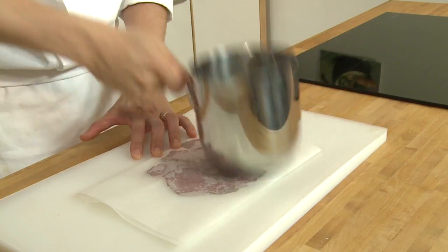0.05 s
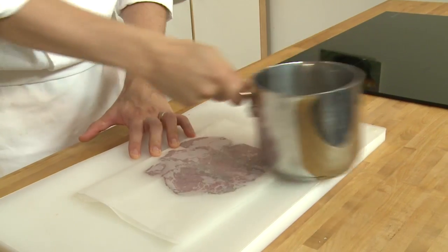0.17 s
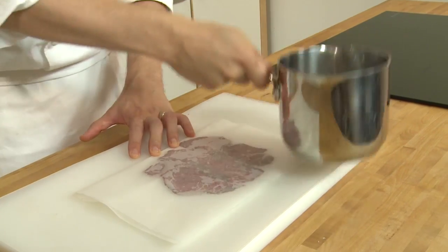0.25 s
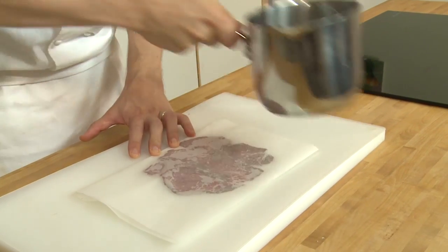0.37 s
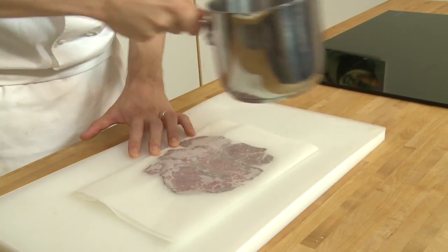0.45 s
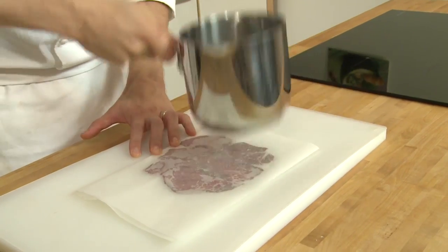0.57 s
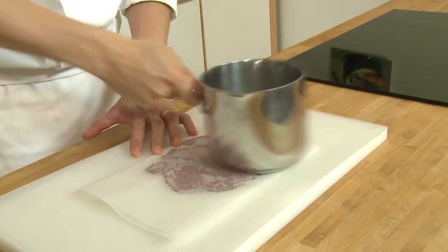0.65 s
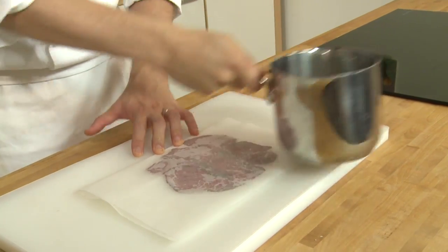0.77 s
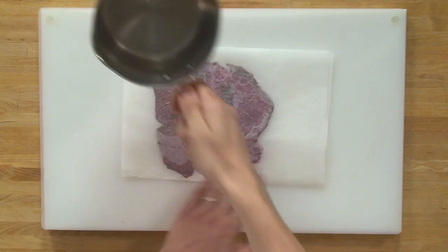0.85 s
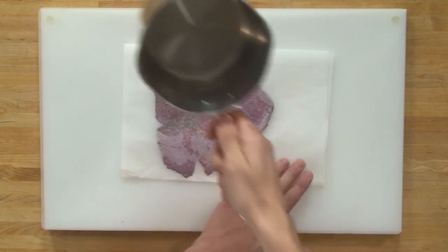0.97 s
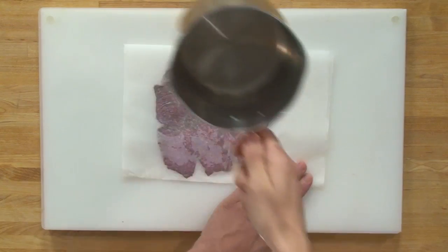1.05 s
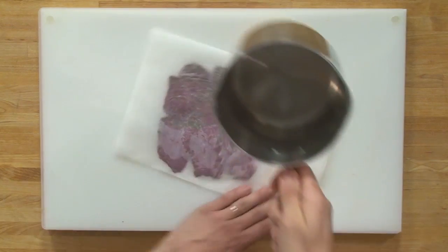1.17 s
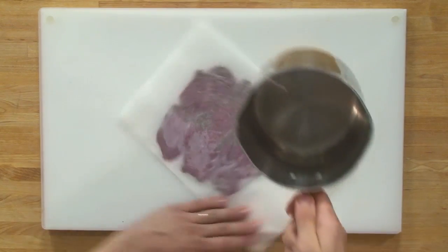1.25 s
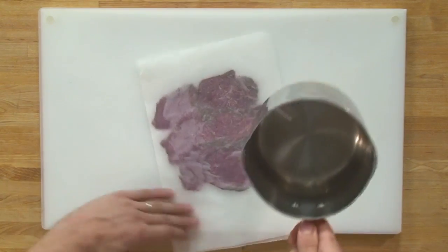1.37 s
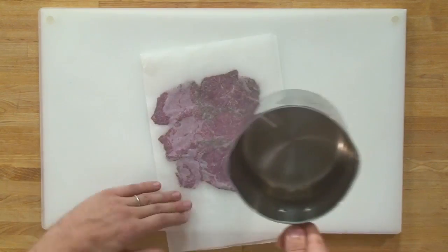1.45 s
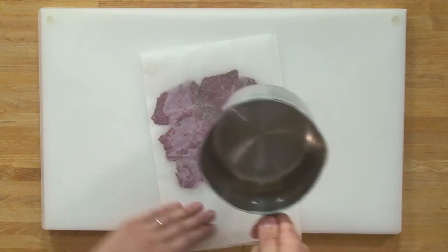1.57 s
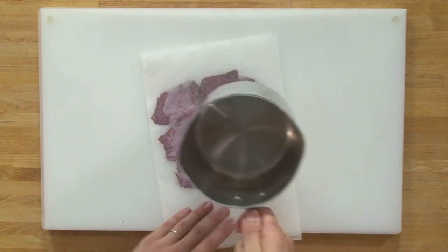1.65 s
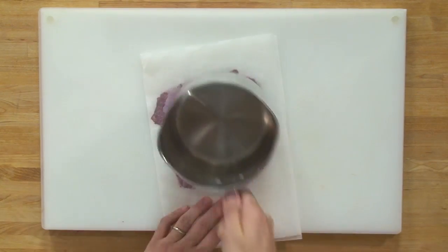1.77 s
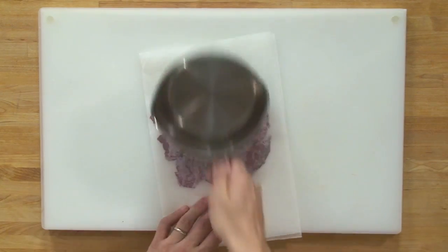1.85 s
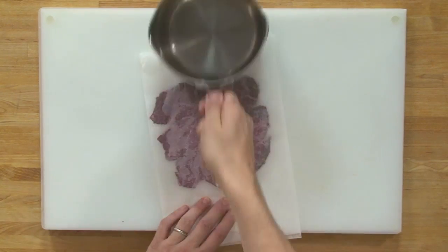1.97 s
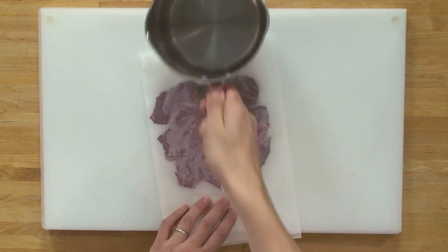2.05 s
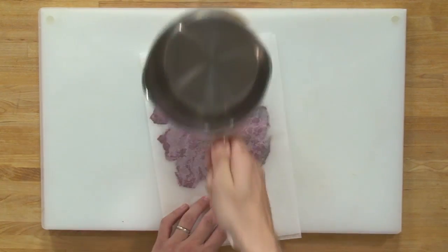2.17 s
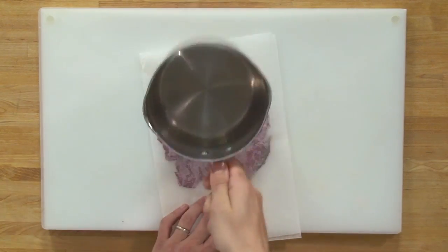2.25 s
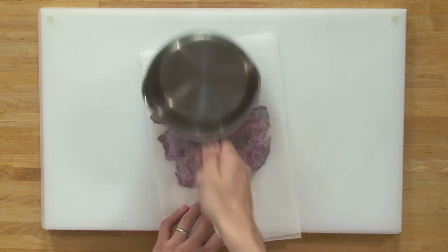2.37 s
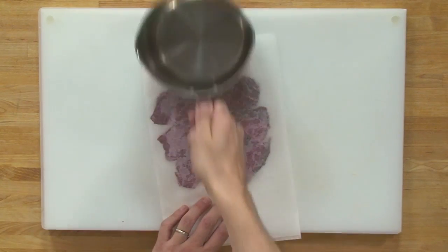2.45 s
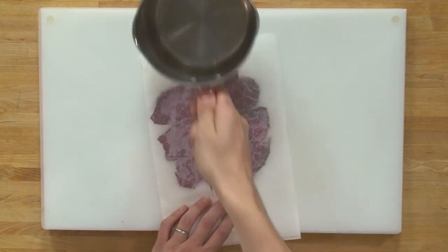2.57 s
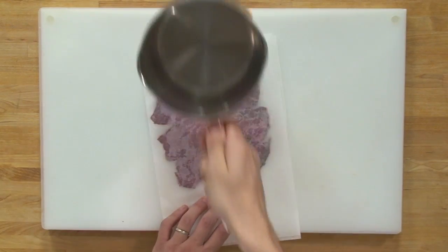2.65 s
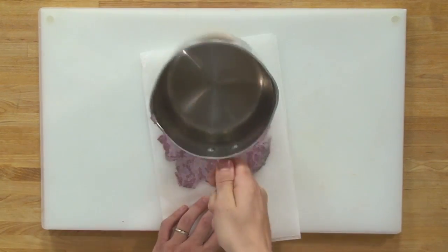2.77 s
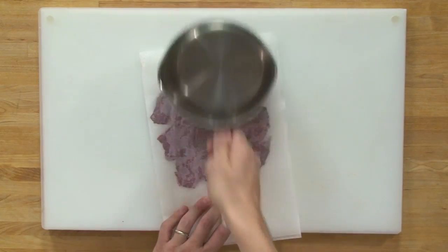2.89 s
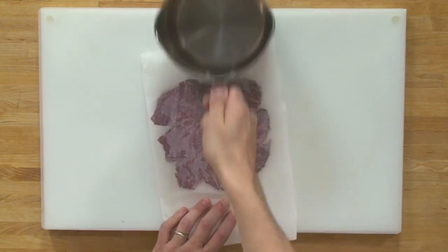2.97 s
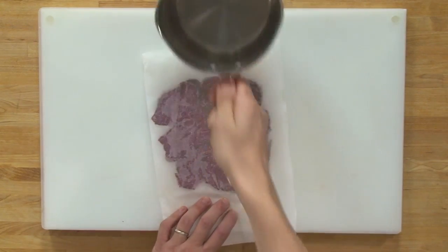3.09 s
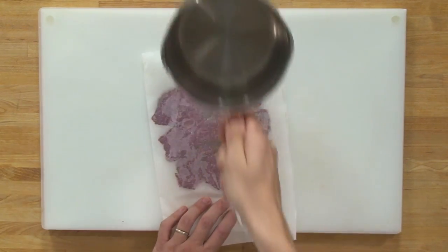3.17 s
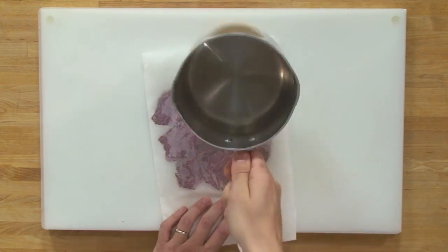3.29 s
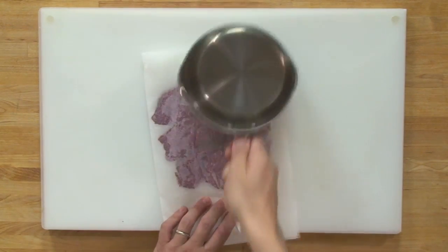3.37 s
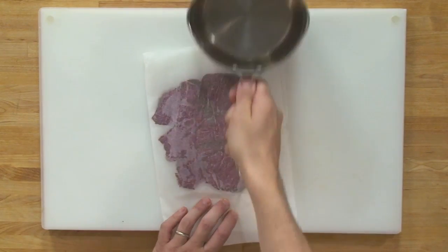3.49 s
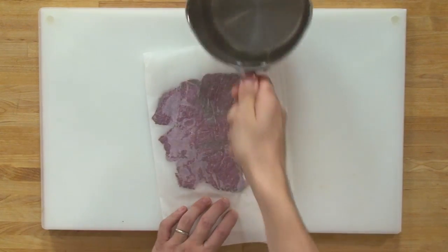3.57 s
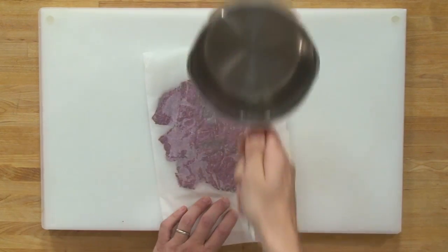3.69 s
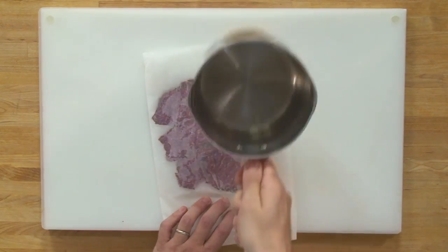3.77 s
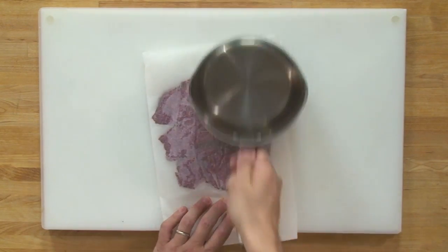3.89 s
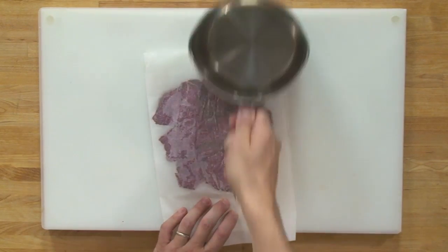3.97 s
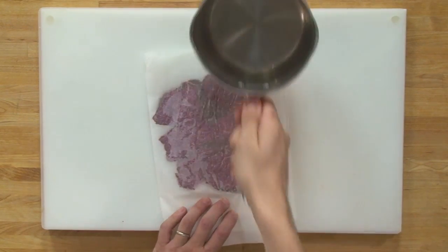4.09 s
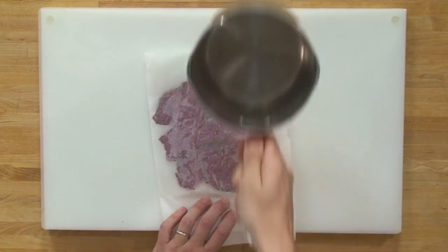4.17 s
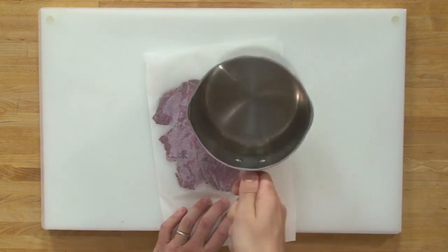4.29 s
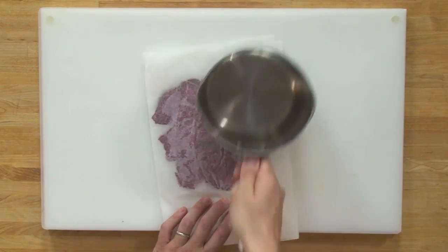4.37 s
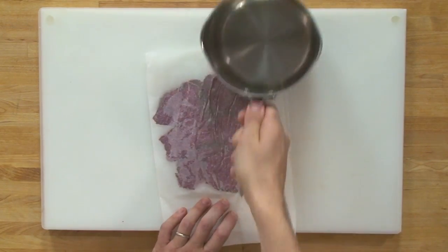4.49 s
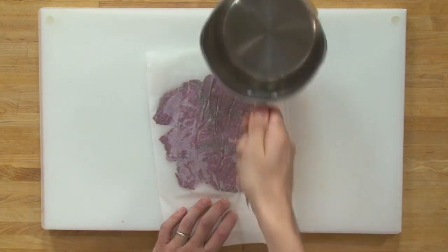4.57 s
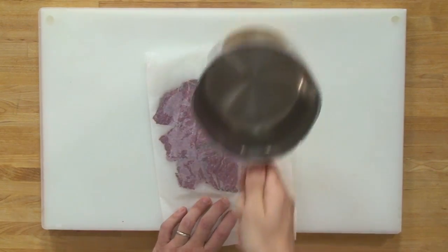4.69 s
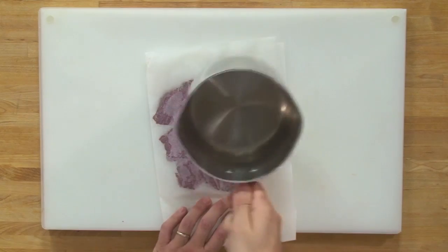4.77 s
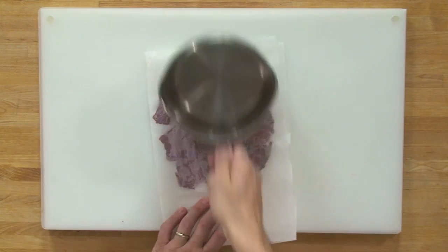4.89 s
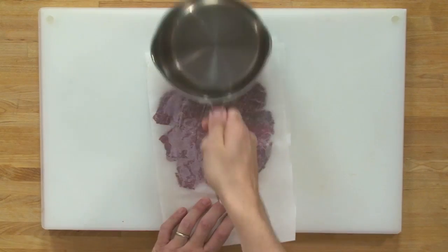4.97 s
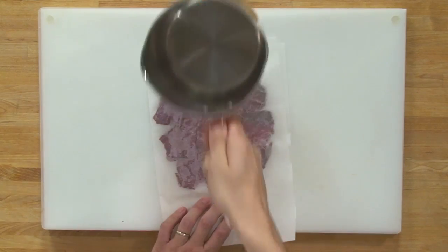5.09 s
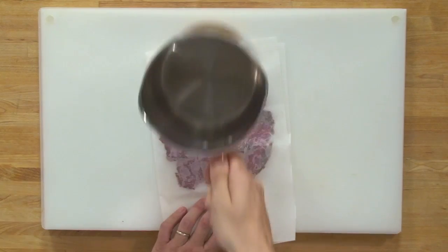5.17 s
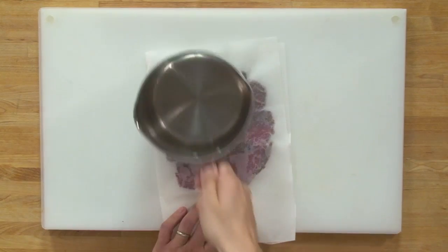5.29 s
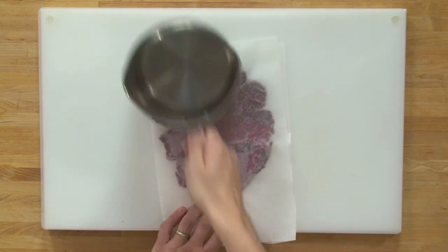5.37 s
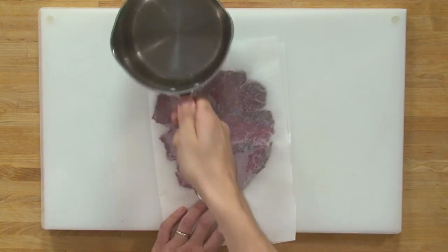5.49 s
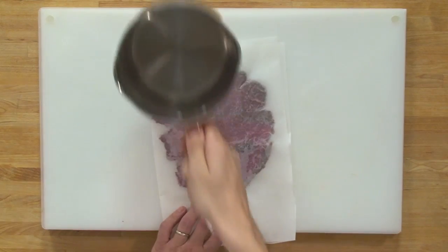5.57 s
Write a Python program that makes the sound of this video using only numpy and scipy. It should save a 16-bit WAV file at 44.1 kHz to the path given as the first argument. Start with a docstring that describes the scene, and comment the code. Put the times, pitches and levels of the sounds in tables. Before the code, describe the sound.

A steel saucepan pounds meat between paper sheets on a plastic board over a wooden worktop. Two hard blows come first, then a faint paper slide and soft bumps, one weak blow, and seven strong blows about half a second apart. Papery slaps, knocks and low booms ring briefly in a small kitchen, miked close over quiet room rumble.

```python
"""Pounding meat in a kitchen

A steel saucepan pounds thin meat between sheets of paper on a plastic cutting board, ten blows.
Each blow is shaped noise (paper slap, clack), dying sines (board, worktop) and short pushes; echoes and
a dense tail make the kitchen. After the second blow a hand turns the paper: grainy friction hiss and
soft bumps. Snaps of noise are the paper ticking as the pan lifts off. A low room tone lies beneath."""
import sys
import numpy as np
from scipy import signal
from scipy.fft import rfft, irfft
from scipy.io import wavfile

SR = 44100
rng = np.random.default_rng(int(sys.argv[2]) if len(sys.argv) > 2 else 0)


def master(y):
    """Save y as 16-bit WAV."""
    cut = np.clip(np.atleast_2d(y).T, -1, 1)
    pcm = np.round(cut * 32767)  # scale
    wavfile.write(sys.argv[1], SR, pcm.astype(np.int16))


N = 248283

# The blows of the pan: (time [s], force re a usual blow [dB], time until the tilted base lands flat [s],
# relative paper slap level [dB], slap brightness [dB per octave])
BLOWS = [(0.1435, 2, 0.0038, -8, 1.5), (0.7095, 1.14, 0.0039, -8.5, -1.5),
         (1.9836, -10.5, 0.0052, -12, 3.5), (2.5114, 0.5, 0.0066, -5.5, -0.6), (3.032, 0, 0.0053, -8, 0.2),
         (3.5312, -0.75, 0.0049, -8, 4), (4.0319, 0.55, 0.0061, -10.5, -.3),
         (4.5092, -0.2, 0.0024, -9, 0.5), (5.008, 0, 0.0066, -11, -1.5), (5.475, 0, 0.0031, -6, 1.1)]
# Spectrum of the hard clack of pan on board: (frequency [Hz], relative density [dB])
CLACK_SPECTRUM = [(300, 0), (550, -1), (800, 0.5), (1300, -4.5), (1800, -8.5), (2600, -9.5), (6000, -29)]


def gain_of(db):
    """Amplitude factor of a level in dB."""
    return 10 ** (np.asarray(db) / 20)


def evened(x):
    """Scales a steady sound to an RMS of one."""
    return x / np.sqrt(np.mean(x ** 2) + 1e-20)


def unit(x):
    """Scales a short sound to an energy of one."""
    return x / np.linalg.norm(x)


def read(points, hz):
    """Reads a curve between its points, along log frequency."""
    f, value = np.transpose(points)
    return np.interp(np.log(hz + 1), np.log(f), value)


def tilted(rows, slope, pivot_hz):
    """Tips the levels of a spectrum or of modes by so many dB per octave."""
    return [(hz, db + slope * np.log2(hz / pivot_hz), *rest) for hz, db, *rest in rows]


def add(mix, s, sound):
    """Lays a sound into the mix at s seconds, cut off at the end."""
    part = mix[round(s * SR):][:len(sound)]
    part += sound[:len(part)]


def colour(x, spectrum, size=4096):
    """Causal minimum-phase filter with the given spectrum."""
    hz = abs(np.fft.fftfreq(size, 1 / SR))
    log_gain = np.log(gain_of(read(spectrum, hz)))
    taps = np.fft.ifft(np.exp(np.conj(signal.hilbert(log_gain)))).real
    return signal.oaconvolve(x, taps[:size // 2])[:len(x)]


def low_pass(x, hz):
    """Gentle second-order treble cut."""
    return signal.sosfilt(signal.butter(2, hz, fs=SR, output="sos"), x)


def ring(modes, t):
    """Resonances as dying sines that start at t = 0."""
    t = np.maximum(t, 0)
    return sum(gain_of(db - 60 * t / t60) * np.sin(2 * np.pi * hz * t) for hz, db, t60 in modes)


def burst(t, rise, fall):
    """Envelope that swells up to t = 0 and dies after it, with time constants in seconds."""
    return np.exp(np.minimum(t, 0) / rise - np.maximum(t, 0) / fall)


def push(t, hz):
    """One soft swing of a struck surface, centred on t = 0, strongest at hz."""
    u = (np.pi * hz * t) ** 2
    return (1 - 2 * u) * np.exp(-u)


def room_tone():
    """Background: low rumble that wanders a little, and faint hiss, both from shaped noise."""
    # spectrum of the quiet room: (frequency [Hz], relative density [dB])
    floor = [(12, -31), (20, -6), (93, 2.5), (285, -11.5), (499, -12.5), (624, -16.5), (759, -16),
             (1440, -24), (2320, -26.5), (4300, -33), (11100, -36), (14700, -44), (16000, -70.5)]
    shape = gain_of(read(floor, np.fft.rfftfreq(N, 1 / SR)))
    noise = evened(irfft(rfft(rng.standard_normal(N)) * shape, N))
    wander_db = 1.46 * evened(low_pass(rng.standard_normal(N), hz=3.3))
    rumble_change = (gain_of(wander_db) - 1) * low_pass(noise, hz=900)
    return gain_of(-52.16) * (noise + rumble_change)


def dying_noise(size):
    """Diffuse sound of the room, each band dying at its own speed."""
    # reverberation of the kitchen: (frequency [Hz], time to fall by 60 dB [s])
    room_t60 = [(100, 0.49), (250, 0.4), (560, 0.28), (1500, 0.26), (4000, 0.27), (10000, 0.27),
                (16000, 0.15)]
    hz, t, bands = signal.stft(rng.standard_normal(size), SR, nperseg=256)
    decay = gain_of(-60 * t / read(room_t60, hz)[:, None])
    tail = signal.istft(bands * decay, SR, nperseg=256)[1][:size]
    tail *= 1 - np.exp(-(np.arange(size) / SR / 0.0022) ** 2)  # soft start
    return signal.sosfilt(signal.butter(2, 190, "high", fs=SR, output="sos"), tail)


def kitchen(x):
    """The room's answer to a steady sound: convolution with a diffuse tail."""
    return signal.oaconvolve(x, unit(dying_noise(size=SR // 2)))[:N]


def echoes(x):
    """Distinct early reflections: delayed, weaker copies."""
    # returns off cupboards, ceiling and walls: (delay [s], gain [factor])
    reflections = [(.0058, 0.3), (0.0105, .25), (0.016, 0.54), (0.023, 0.31), (0.0287, 0.28), (.041, .09),
                   (0.048, 0.14), (0.064, 0.26)]
    out = np.zeros(N)
    for delay, gain in reflections:
        add(out, delay, gain * x)
    return out


def stroke(start, length, db):
    """Level of the friction as the hand speeds up and slows down, and the paper settles."""
    now = np.arange(N) / SR
    progress = np.clip((now - start) / length, 0, 1)
    speed = np.sin(np.pi * progress ** 1.38)  # fastest late in the stroke
    level_db = db + 0.6 * 20 * np.log10(abs(speed) + 1e-12)
    settle = 458 * now  # the level falls no faster than 458 dB per second
    return gain_of(np.maximum.accumulate(level_db + settle) - settle)


def rubbing(level, spectrum):
    """Friction hiss with the grain of catching fibres, following the level of a stroke."""
    catches = rng.standard_normal(N) * (rng.random(N) < 900 / SR)  # 900 per second on average
    grip = gain_of(evened(low_pass(rng.standard_normal(N), hz=79.7)))  # flutters by 1 dB RMS
    hiss = rng.standard_normal(N) + 0.29 * evened(catches)
    return level * grip * evened(colour(hiss, spectrum))


def slides():
    """The paper is turned and nudged over the board; it rasps where the palm presses it."""
    # strokes of paper over the board: (start [s], length [s], relative level [dB])
    strokes = [(1.129, 0.023, -28.5), (1.19, 0.37, -36.5), (1.835, 0.042, -30)]
    # spectrum of sliding paper: (frequency [Hz], relative density [dB])
    paper_spectrum = [(180, -29), (400, -16), (800, -12.5), (1500, -16), (2200, -9), (2900, -2),
                      (4000, -10), (5300, -2), (7200, -5.5), (10600, -5), (14500, -10.5), (16000, -24.5)]
    # spectrum of pressed, rasping paper: (frequency [Hz], relative density [dB])
    rasp_spectrum = [(400, -16), (700, -7), (1300, -22), (1900, -12), (2300, 1), (3100, 0), (3900, -17.5),
                     (7000, -34), (10500, -2), (14000, -15)]
    sliding = rubbing(sum(stroke(*row) for row in strokes), paper_spectrum)
    rasp = rubbing(stroke(start=1.385, length=0.16, db=-40.5), rasp_spectrum)
    return gain_of(-2.5) * sliding + rasp


def ticks():
    """Single snaps of the paper, and fine crackle as the pan peels off after each blow."""
    # the paper ticks and unsticks: (time [s], relative level [dB])
    snap_times = [(1.012, -38), (1.6546, -24), (1.9326, -26), (2.0706, -15), (3.0116, -28.5),
                  (3.0958, -17.5), (3.121, -12), (3.289, -38), (4.1064, -18), (4.1727, -22.5),
                  (4.6463, -26.5), (4.8655, -42), (5.069, -24), (5.2417, -30)]
    # spectrum of a paper tick: (frequency [Hz], relative density [dB])
    tick_spectrum = [(500, -8), (2000, -3.5), (3200, -2.5), (5000, -2), (7500, 0), (12000, -1),
                     (16000, -9.5)]
    out, t = np.zeros(N), np.arange(SR // 4) / SR
    for s, db in snap_times:
        snap = unit(rng.standard_normal(len(t)) * burst(t - .001, rise=0.00047, fall=0.00074))
        tail = unit(dying_noise(size=len(t)))
        add(out, s, gain_of(db + 9) * (snap + gain_of(-4) * tail))
    now = np.arange(N) / SR
    # the peeling is strongest 80 ms after each blow
    peeling = sum(gain_of(slap_db) * burst(now - s - .08, rise=0.0131, fall=0.04)
                  for s, _, _, slap_db, _ in BLOWS)
    crackle = rng.standard_normal(N) * (rng.random(N) < 1500 / SR)  # 1500 per second on average
    return colour(out + gain_of(-23.5) * peeling * crackle, tick_spectrum)


def bumps():
    """Soft touches of hand and pan: one push of the board, a loose rumble after it, a small tap."""
    # touches on the board: (time [s], relative thud level [dB], thud frequency [Hz])
    touches = [(.99, -32, 157), (1.031, -28.5, 118), (1.144, -30.5, 120), (1.241, -38.5, 153),
               (1.448, -33, 81), (2.122, -29.5, 120), (3.289, -42, 118), (3.808, -40.5, 125),
               (4.201, -44, 114), (5.306, -41, 110.1)]
    out, t = np.zeros(N), np.arange(SR // 2) / SR
    for s, db, hz in touches:
        loose, hard = rng.standard_normal((2, len(t)))
        rumble_spectrum = [(hz / 4, -22), (hz * 0.63, 0), (hz * 3, -24), (hz * 20, -70)]
        rumble = colour(loose * burst(t - .012, rise=0.0042, fall=0.024), rumble_spectrum)
        tap_db = db + 1.5 + 22 * np.log2(hz / 120)  # the quicker the bump, the more it taps
        tap = low_pass(hard, hz=2500) * burst(t - .002, rise=0.0004, fall=0.00075)
        add(out, s, gain_of(db + 21) * unit(push(t - .006, hz)))
        add(out, s, gain_of(db + 22.5) * unit(rumble))
        add(out, s, gain_of(tap_db) * unit(colour(tap, CLACK_SPECTRUM)))
    return out


def follow(law, force_db, flat_s):
    """What a blow of this force and tilt makes of one part of the sound.

    A law is (value at a usual blow, change per dB of force, change per doubling of the time to land flat)."""
    usual, per_force, per_tilt = law
    return usual + per_force * force_db + per_tilt * np.log2(flat_s / .0048)  # usually flat in 4.8 ms


def landing(t, flat_s, flat_db):
    """The edge of the base lands first, then the base falls flat."""
    edge = burst(t - .0013, rise=0.00096, fall=0.0015)
    flat = burst(t - .0012 - flat_s, rise=0.0002, fall=0.0041)
    return edge + gain_of(flat_db) * flat


def meat_squelch(t):
    """The meat squelches on briefly after the landing, in two swells."""
    first = burst(t - .003, rise=0.00095, fall=0.0035)
    second = burst(t - .012, rise=0.00033, fall=0.0065)
    return gain_of(-10) * first + gain_of(-13.5) * second


def struck_noise(envelope, spectrum):
    """Slap or clack: the rough contact of surfaces as noise in the envelope of the landing."""
    return unit(colour(rng.standard_normal(len(envelope)) * envelope, spectrum))


def board_knock(t, hardness):
    """The board rings briefly; a harder landing favours its upper modes."""
    # cutting board, damped by the meat: (frequency [Hz], relative level [dB], time to fall by 60 dB [s])
    board = [(269, -2.5, 0.049), (313, -9, 0.084), (361, 1, 0.04), (490, -11, 0.011), (547, -4.5, 0.031),
             (597, -2.5, 0.028), (737, -10, 0.046)]
    # each spot on the board detunes the modes a little
    modes = [(hz * rng.uniform(0.95, 1.02), db, t60)
             for hz, db, t60 in tilted(board, hardness, pivot_hz=370)]
    give = burst(t - .0042, rise=0.0012, fall=0.94)  # the meat cushions the start
    return unit(ring(modes, t - .0019) * give)


def worktop_boom(t):
    """The worktop and the low room resonances ring on; the boom takes a moment to build up."""
    # worktop and room: (frequency [Hz], relative level [dB], time to fall by 60 dB [s])
    worktop = [(42.6, -11, 0.43), (67.6, -16.5, 0.68), (85.45, -3.5, 0.41), (97.9, -1.5, 0.22),
               (122.4, -16.5, 0.78), (157.5, 4, 0.23), (173, -0.5, 0.3), (193, -12.5, 0.4)]
    build = 1 - burst(t - .006, rise=1, fall=0.0089)
    return unit(ring(worktop, t - .006) * build)


def blows():
    """Main source: the sharp part and the deep part of the blows, and what rings on after them.

    A square blow knocks the board hard; a tilted one lands twice and shoves the worktop instead."""
    # spectrum of the paper slap: (frequency [Hz], relative density [dB])
    slap_spectrum = [(600, -31), (1500, 1.5), (2400, 1), (3500, 3.5), (4500, -1.5), (6500, -3), (10500, -4),
                     (13000, -9.5), (16000, -21)]
    # all the board radiates into the room: (frequency [Hz], relative density [dB])
    body = [(100, -7), (200, -2.5), (350, -2), (600, -2), (800, -13.5), (1200, -17.5), (3000, -55)]
    sharp, deep, after = np.zeros((3, N))
    lead = .01  # seconds kept ahead of the blow for the swelling envelopes
    t = np.arange(SR // 2) / SR - lead
    for s, force_db, flat_s, slap_db, bright in BLOWS:
        thump_db = follow((5, 0.53, 6), force_db, flat_s)
        knock_db = follow((11.5, 1.5, -5), force_db, flat_s)
        clack_db = follow((6, 0.53, -0.9), force_db, flat_s)
        crack_db = follow((-4.5, 5, -7), force_db, flat_s)
        flat_db = follow((-6, -0.6, 11.5), force_db, flat_s)  # second landing, re the first
        hardness = follow((-1.1, 1.7, -5), force_db, flat_s)  # dB per octave across the board's modes

        contact, squelch = landing(t, flat_s, flat_db), meat_squelch(t)
        paper = tilted(slap_spectrum, bright, pivot_hz=5000)
        slap = gain_of(slap_db + 16) * struck_noise(contact + squelch, paper)
        clack = gain_of(clack_db) * struck_noise(contact + gain_of(-1.5) * squelch, CLACK_SPECTRUM)
        knock = gain_of(knock_db) * board_knock(t, hardness)
        # the steel edge bottoms out on the board
        crack = gain_of(crack_db) * unit(push(t - .0014, hz=1210))
        add(sharp, s - lead, slap + clack + knock - crack)
        add(deep, s - lead, gain_of(thump_db) * unit(push(t - .0025, hz=135)))
        add(after, s - lead, gain_of(thump_db + 1.5) * worktop_boom(t))

        # the room gathers sound from every side of pan and board, so its tail is dense and smooth
        radiated = tilted(body, hardness, pivot_hz=370)
        for db, spectrum in [(slap_db + 9, paper), (clack_db, CLACK_SPECTRUM), (knock_db - 10.5, radiated)]:
            add(after, s, gain_of(db) * unit(colour(dying_noise(size=len(t)), spectrum)))
    return sharp, deep, after


def scene():
    """Mixes blows, touches, paper and room into two equal channels."""
    sharp, deep, after = blows()
    paper = slides()
    # the deep thump arrives mostly as distinct echoes; the furniture scatters the rest
    early = echoes(deep + gain_of(-7.5) * low_pass(sharp, hz=400) + gain_of(-20) * sharp)
    pounding = sharp + gain_of(-18.5) * deep + early + after
    handling = bumps() + ticks() + paper + gain_of(-12) * kitchen(paper)
    mono = pounding + handling + room_tone()
    return np.array([mono, mono])


def record(dry):
    """One microphone on both channels; the highest peaks are rounded off, then the band limit."""
    ceiling = .85  # of full scale
    rounded = dry / (1 + (dry / ceiling) ** 6) ** (1 / 6)
    band_limit = signal.firwin(301, 16100, window=("kaiser", 9), fs=SR)  # treble ends at 16.1 kHz
    return signal.oaconvolve(rounded, band_limit[None], "same")


dry = scene()
out = record(dry)
master(out)
```